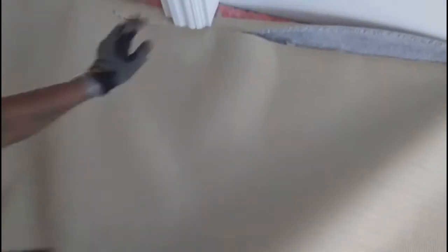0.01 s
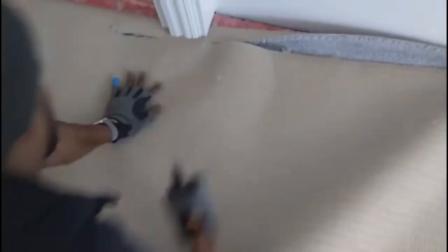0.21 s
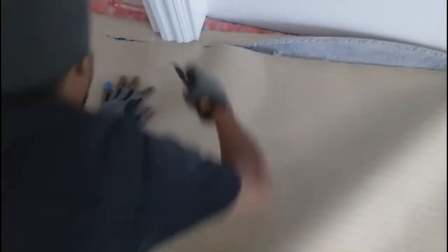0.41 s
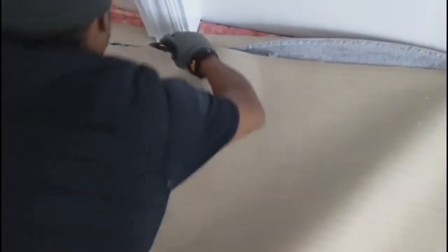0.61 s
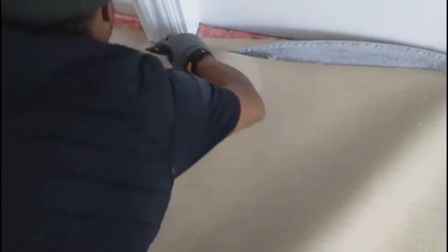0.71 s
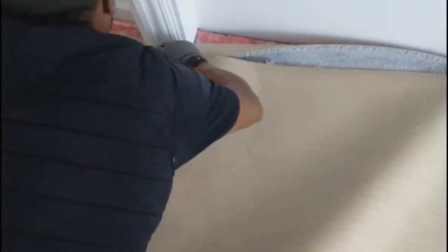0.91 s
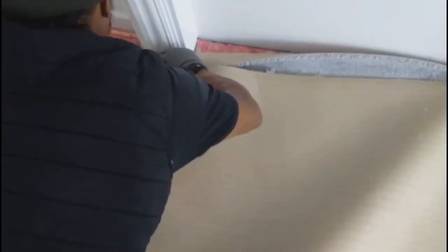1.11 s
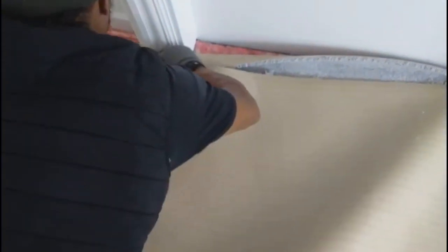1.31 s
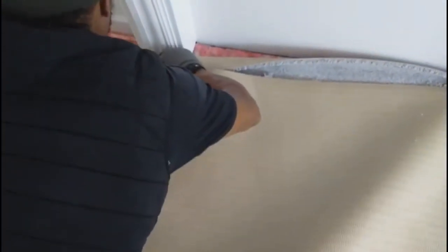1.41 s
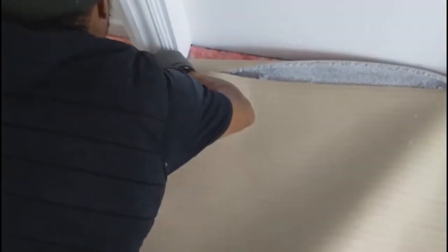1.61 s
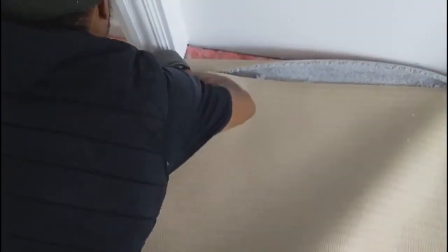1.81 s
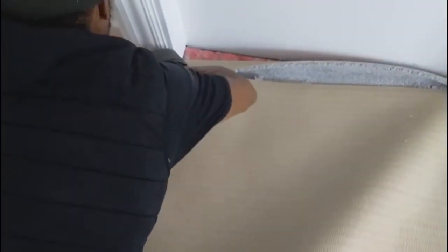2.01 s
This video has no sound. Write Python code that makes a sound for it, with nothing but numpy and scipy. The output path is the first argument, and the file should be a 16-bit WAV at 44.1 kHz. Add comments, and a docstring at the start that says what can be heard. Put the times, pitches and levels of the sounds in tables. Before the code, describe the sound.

A carpet stretcher gives one hard, hollow knock at about 0.2 seconds, ringing through the floorboards and small bare room for half a second. Gloves brush faintly over the carpet throughout. A steel blade scrapes lightly and ticks around 1.4 seconds. At 1.9 seconds a board thumps softly, and the blade grinds and clicks until just after 2 seconds, much quieter than the knock. Faint hiss lies underneath.

```python
"""Fitting carpet in a bare room

One microphone in a small room with a wooden floor, within earshot of the work at the skirting board.
One hard knock of a knee-kicked stretcher sets the boards and the room ringing. Knees drag, gloves
brush the pile and weight shifts on the boards. A steel tucking blade scrapes and clicks as it forces
the carpet's edge down. Behind it all lie a faint hiss and a low drone."""
import sys
import numpy as np
from scipy import signal
from scipy.fft import rfft, irfft
from scipy.io import wavfile

SR = 44100
rng = np.random.default_rng(int(sys.argv[2]) if len(sys.argv) > 2 else 0)


def generate_wav(sig):
    """Save sig (samples, or channels by samples) to the path in sys.argv[1] as 16-bit PCM at SR."""
    pcm = np.round(np.clip(np.atleast_2d(sig).T, -1, 1) * 32767).astype(np.int16)
    wavfile.write(sys.argv[1], SR, pcm)


N = 92610
TIME = np.arange(N) / SR


def from_db(db):
    """Decibels to gain."""
    return 10 ** (np.asarray(db) / 20)


def unit_rms(x):
    """Scale to unit rms."""
    return x / np.sqrt(np.mean(x ** 2) + 1e-20)


def at_hz(points, hz):
    """Read a table on a log-frequency axis."""
    points_hz, values = np.transpose(points)
    return np.interp(np.log(np.maximum(hz, 1)), np.log(points_hz), values)


def colour(noise, spectrum, tilt_db=0):
    """Give a noise a spectrum, tilted per octave and falling away below its first point; rms 1."""
    hz = np.maximum(np.arange(N // 2 + 1) * SR / N, 1)
    gain = from_db(at_hz(spectrum, hz) + tilt_db * np.log2(hz))
    bass_rolloff = np.minimum(hz / spectrum[0][0], 1) ** 2
    return unit_rms(irfft(rfft(noise) * gain * bass_rolloff, N))


def decay(start, t60):
    """Sudden start, exponential decay."""
    return (TIME >= start) * from_db(-60 * np.maximum(TIME - start, 0) / t60)


def rise(start, rise_s):
    """Straight ramp from silence to full level."""
    return np.clip((TIME - start) / rise_s, 0, 1)


def pulses(times, levels_db):
    """One click per contact."""
    out = np.zeros(N)
    np.add.at(out, (np.asarray(times) * SR).astype(int), from_db(levels_db))
    return out


def ring(force, modes):
    """A force sets a body's modes ringing, with alternating signs."""
    out = 0
    for k, (hz, db, t60) in enumerate(modes):
        radius, angle = np.exp(-np.log(1000) / (t60 * SR)), 2 * np.pi * hz / SR
        poles = [1, -2 * radius * np.cos(angle), radius ** 2]
        out += (-1) ** k * from_db(db) * signal.lfilter([0, np.sin(angle)], poles, force + 1e-18)
    return out


def friction(spectrum, tilt_db, grains_per_s, spread_db, smooth):
    """Fibres snap free at random, in uneven sizes, over a smooth steady hiss."""
    sizes = from_db(spread_db * np.minimum(rng.exponential(1, N), 4)) * rng.choice([-1, 1], N)
    grains = unit_rms(sizes * (rng.random(N) < grains_per_s / SR))
    return colour(grains + smooth * rng.standard_normal(N), spectrum, tilt_db)


def stroke(start, length, db, rise_s=0.027, t60_s=0.35):
    """The level of a rubbing movement swells, holds and dies away in the room."""
    since_end = np.maximum(TIME - start - length, 0)
    return from_db(db) * rise(start, rise_s) * from_db(-60 * since_end / t60_s)


# Reverberation of the bare room: frequency_hz, t60_s
ROOM_DECAY = [(100, 0.6), (400, 0.55), (800, 0.51), (2000, 0.4), (5000, 0.35), (11000, 0.36)]
def room_tail(start, spectrum, tilt_db=0):
    """Dense reflections build up, then die octave by octave, the treble first."""
    noise = rfft(colour(rng.standard_normal(N), spectrum, tilt_db))
    hz = np.arange(len(noise)) * SR / N
    octave = np.log2(np.clip(hz, 100, 12800) / 100)
    tail = 0
    for k in range(8):
        band = irfft(noise * np.maximum(1 - abs(octave - k), 0), N)
        tail += band * decay(start, at_hz(ROOM_DECAY, 100 * 2 ** k))
    return tail * rise(start, rise_s=0.0034)


# Still air all around the microphone: frequency_hz, density_db
AIR_SPECTRUM = [(30, -30.5), (60, -10.5), (100, 5.5), (150, -11), (300, -18), (1000, -26), (2500, -26.5),
                (5200, -21), (8000, -25), (11500, -29.5)]
def room_tone(air_db=-66, drone_hz=93.7, drone_db=-79):
    """Faint hiss and rumble with a low drone."""
    air = from_db(air_db) * colour(rng.standard_normal(N), AIR_SPECTRUM)
    drone = from_db(drone_db) * np.sin(2 * np.pi * (drone_hz * TIME + rng.random()))
    return air + drone


# Knees moving down on the floor: start_s, length_s, level_db
KNEE_DRAGS = [(0.651, .13, -70.5), (1.303, 0.058, -69), (1.627, 0.063, -70.5)]
# Their muffled rub: frequency_hz, density_db
KNEE_SPECTRUM = [(260, 1), (440, 1), (1100, -32)]
def knees():
    """Dull rub of knees dragging on the carpet."""
    rub = friction(KNEE_SPECTRUM, 0, grains_per_s=900, spread_db=4.5, smooth=0.55)
    return sum(stroke(*drag) for drag in KNEE_DRAGS) * rub


# Gloves passing over the carpet: start_s, length_s, level_db, tilt_db_per_octave
GLOVE_BRUSHES = [(-.02, 0.076, -54.5, -0.5), (0.07, 0.17, -60.5, -1), (0.362, .21, -57, 0),
                 (0.62, 0.18, -63, -1), (1.105, 0.026, -75, 22), (1.283, 0.058, -69.5, 0),
                 (1.56, 0.19, -65.5, 4.5), (1.685, 0.34, -60.5, 6.5)]
# The brushed pile: frequency_hz, density_db
PILE_SPECTRUM = [(200, -10), (700, 2.5), (1200, 1), (2400, -2), (3800, 0.5), (5500, -1.5), (7500, -9),
                 (11500, -14)]
def gloves():
    """Fine hiss of gloves and sleeves on the pile."""
    out = 0
    for start, length, db, tilt_db in GLOVE_BRUSHES:
        hiss = friction(PILE_SPECTRUM, tilt_db, grains_per_s=1700, spread_db=1.0, smooth=3.5)
        out += stroke(start, length, db) * hiss
    return out


# Weight shifting on the boards under the fitter: start_s, level_db, pitch_hz
WEIGHT_SHIFTS = [(1.082, -49.5, 130), (1.123, -62.5, 145), (1.47, -53.5, 148), (1.646, -56, 179),
                 (1.883, -29, 153), (1.921, -49, 145), (2.035, -36.5, 185)]
# The boards around the fitter: pitch_hz, gain_db, t60_s
BOARD_MODES = [(128, -5.5, 0.35), (152.7, -7, 0.5), (306, -15.5, 1), (440, -16.5, 0.54), (557, -9.5, 0.61)]
# Carpet giving under a push, heard off the walls: frequency_hz, density_db
SCUFF_SPECTRUM = [(110, -1), (155, 5), (260, -12.5), (450, -11.5), (700, -20.5), (2000, -32.5)]
def board_thumps(rise_s=0.0061, t60_s=0.099, room_db=-15, ring_db=-6, soft_hz=280):
    """Each soft push flexes one board for a few cycles; the floor and the room answer faintly."""
    thumps = 0
    for start, db, hz in WEIGHT_SHIFTS:
        flex = rise(start, rise_s) * decay(start, t60_s) * np.sin(2 * np.pi * hz * (TIME - start))
        echo = from_db(room_db) * room_tail(start + rise_s, SCUFF_SPECTRUM)
        thumps += from_db(db) * (flex + echo)
    times, levels_db, _ = np.transpose(WEIGHT_SHIFTS)
    soften = signal.butter(2, soft_hz, fs=SR, output="sos")
    pushes = signal.sosfilt(soften, pulses(times, levels_db + ring_db))
    return thumps + ring(pushes, BOARD_MODES)


# Resonances of the tucking blade: pitch_hz, width_hz, gain_db
STEEL_MODES = [(2420, 400, 4), (3350, 30, 9), (6100, 103, 14.5)]
def steel(scrape, share=1):
    """The blade sings along with whatever scrapes it; share scales the added ring."""
    out = scrape
    for hz, width, db in STEEL_MODES:
        radius = np.exp(-np.pi * width / SR)
        zeros = np.array([1, 0, -1]) * (1 - radius ** 2) / 2
        poles = [1, -2 * radius * np.cos(2 * np.pi * hz / SR), radius ** 2]
        out = out + share * from_db(db) * signal.lfilter(zeros, poles, scrape + 1e-18)
    return out


# Blade passes along the skirting board: start_s, length_s, level_db, tilt_db_per_octave
BLADE_SLIDES = [(0.831, 0.1, -65, 3.5), (1.398, 0.08, -53.5, -0.7), (1.467, 0.022, -55, -2)]
# Their thin scrape: frequency_hz, density_db
SLIDE_SPECTRUM = [(300, 0), (780, -4.5), (1000, 7.5), (1550, 8), (2000, 1.5), (2900, 5), (4000, 6.5),
                  (5700, 12.5), (7000, 0.5), (8400, 4.5), (9200, -10), (11500, -6.5)]
def blade_slides():
    """The blade slides lightly along the carpet's edge."""
    out = 0
    for start, length, db, tilt_db in BLADE_SLIDES:
        scrape = friction(SLIDE_SPECTRUM, tilt_db, grains_per_s=8400, spread_db=0, smooth=1.5)
        out += stroke(start, length, db) * scrape
    return out


# Pushes into the gap under the skirting board: start_s, length_s, level_db
BLADE_TUCKS = [(1.913, 0.079, -48.5), (2.006, 0.035, -43.5)]
# The carpet's stiff backing: frequency_hz, density_db
BACKING_SPECTRUM = [(100, 2), (180, -26), (550, -7), (800, 5), (1800, 0), (2600, -1), (4200, -4),
                    (6200, -7), (8000, -12.5), (9300, -11), (11500, -11.5)]
def blade_tucks():
    """The blade grinds the coarse backing down, and both steel and boards sound."""
    grind = friction(BACKING_SPECTRUM, 0, grains_per_s=3000, spread_db=3.0, smooth=1.0)
    boards = unit_rms(ring(rng.standard_normal(N), BOARD_MODES))
    return sum(stroke(*tuck) for tuck in BLADE_TUCKS) * (steel(grind, share=0.17) + boards)


# The blade catching and slipping at the edge: start_s, length_s, level_db, tilt_db_per_octave
BLADE_SLIPS = [(.722, 0.0011, -61, 13), (1.4713, 0.00069, -46.5, 3), (1.7215, .001, -66, 6),
               (1.882, 0.0032, -55, -0.5), (1.93, 0.0076, -44.5, -4), (1.9617, 0.0029, -42, -3),
               (2.0227, 0.008, -41, -2.5), (2.0274, 0.0024, -39, -5), (2.035, 0.0017, -42.5, -2.5)]
# The crunch of one slip: frequency_hz, density_db
SLIP_SPECTRUM = [(300, -9), (900, -8), (1600, -7), (2500, -7.5), (4300, -11), (7800, -7), (9500, -19.5),
                 (11500, -16.5), (14000, -36)]
def blade_clicks(rise_s=0.0019, t60_s=0.0061, room_db=-7):
    """Each slip is a crunch of a few milliseconds that rings the steel and echoes in the room."""
    direct, echo = 0, 0
    for start, length, db, tilt_db in BLADE_SLIPS:
        end = start + length
        envelope = rise(start - rise_s, rise_s) * np.where(TIME < end, 1, decay(end, t60_s))
        direct += from_db(db) * envelope * colour(rng.standard_normal(N), SLIP_SPECTRUM, tilt_db)
        echo += from_db(db + room_db) * room_tail(start, SLIP_SPECTRUM, tilt_db)
    return steel(direct) + steel(echo, share=0.42)


# The stretcher's contacts, first touch to last rebound: start_s, crack_db, push_db
KICK_CONTACTS = [(0.2279, -4.5, -24), (0.2316, -5.5, -14.5), (0.2340, 1, -2.5), (0.2415, -8, -12.5)]
# The crack, straight to the microphone: frequency_hz, density_db
CRACK_SPECTRUM = [(100, 5.5), (400, 10.5), (750, 3.5), (1150, -16), (2000, 0), (4200, 1), (6000, -5),
                  (8500, -10.5), (11500, -15)]
# Dead, hollow thud of the stretcher's head in the carpet: pitch_hz, gain_db, t60_s
HEAD_MODES = [(108, -4, .075), (170, -8, 0.06), (380, -16, 0.015), (806, -13, 0.06)]
# Floorboards and low room resonances: pitch_hz, gain_db, t60_s
FLOOR_AND_ROOM_MODES = [(78.6, -20.5, 0.72), (93.27, -14, .53), (151.4, -18.5, 0.34), (164.9, -22, 0.45),
                        (182, -14, 0.45), (274.2, -26.5, 0.3), (367.3, -23.5, 0.42), (417, -21, 0.3),
                        (444.3, -21.5, 0.53), (505, -26, 0.33), (720.5, -23.5, 0.3), (835, -24.5, 0.34),
                        (885, -30.5, .35)]
# The boom, coming back from the walls farther off: frequency_hz, density_db
BOOM_SPECTRUM = [(65, -21.5), (90, -8), (180, 0.5), (290, -9), (450, -2), (850, -7.5), (1100, -15),
                 (1900, -16.5), (4200, -17.5), (8000, -24), (11500, -32)]
def stretcher_knock(crack_gain_db=-14, crack_t60_s=0.02, boom_db=-18):
    """Quick contacts crack, thud and drive the floor; the boom fills the room from the second on."""
    times, crack_db, push_db = np.transpose(KICK_CONTACTS)
    bursts = sum(from_db(db) * decay(start, crack_t60_s) for start, db in zip(times, crack_db))
    crack = from_db(crack_gain_db) * bursts * colour(rng.standard_normal(N), CRACK_SPECTRUM)
    pushes = pulses(times, push_db)
    boom = from_db(boom_db) * room_tail(times[1], BOOM_SPECTRUM)
    return crack + ring(pushes, HEAD_MODES) + ring(pushes, FLOOR_AND_ROOM_MODES) + boom


def scene():
    """All sources meet at one microphone in the room."""
    fitter = stretcher_knock() + board_thumps() + knees() + gloves()
    blade = blade_slides() + blade_tucks() + blade_clicks()
    return (fitter + blade + room_tone())[None]


def record(dry, low_cut_hz=52, high_cut_hz=11700):
    """The microphone sheds deep bass; the top is cut steeply."""
    low_cut = signal.butter(5, low_cut_hz, "high", fs=SR, output="sos")
    high_cut = signal.ellip(10, 0.3, 70, high_cut_hz, fs=SR, output="sos")
    return signal.sosfilt(high_cut, signal.sosfilt(low_cut, dry))


dry = scene()
out = record(dry)
generate_wav(out)
```